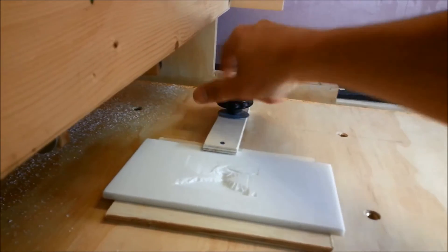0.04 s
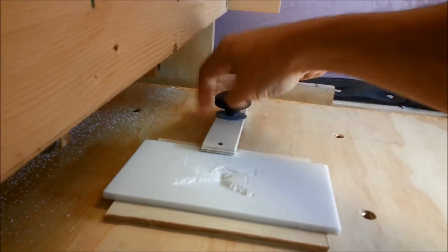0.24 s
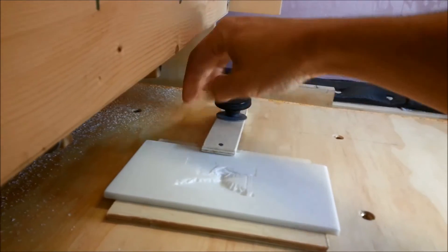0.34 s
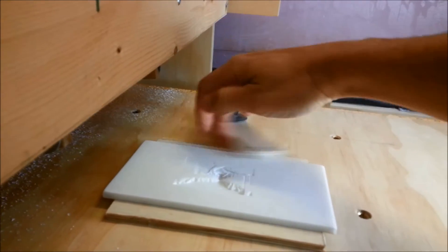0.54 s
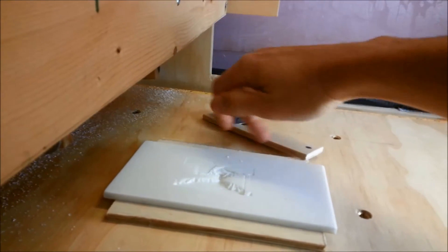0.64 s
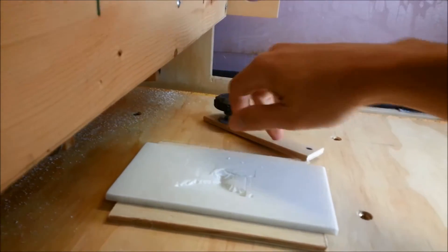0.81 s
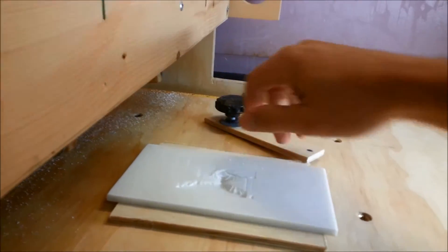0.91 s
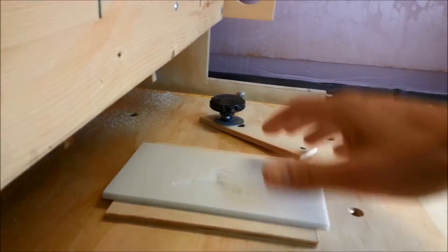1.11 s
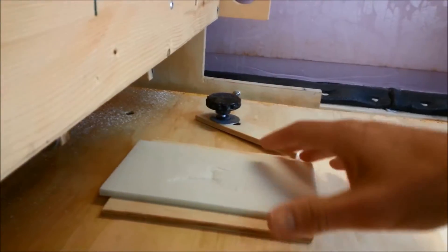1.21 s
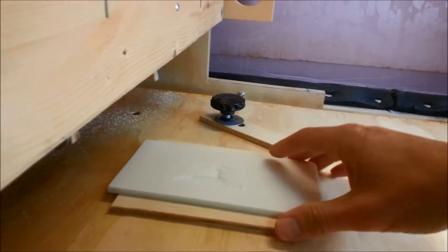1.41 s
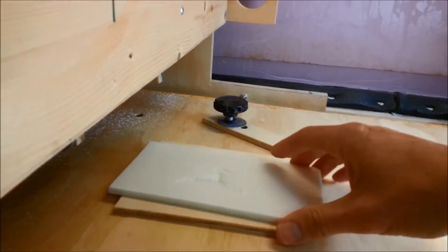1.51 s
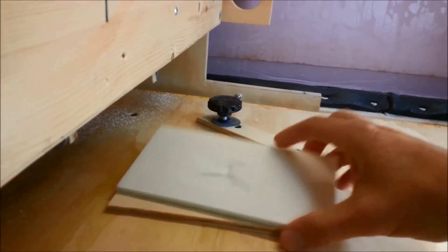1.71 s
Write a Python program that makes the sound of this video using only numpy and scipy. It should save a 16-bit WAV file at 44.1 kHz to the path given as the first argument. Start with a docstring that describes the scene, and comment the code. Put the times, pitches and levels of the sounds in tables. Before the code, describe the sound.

A clamp is loosened close by, slightly to the right, its knob rasping and ticking from about 0.2 to 0.5 seconds. The metal bar scrapes briefly around 0.6 seconds, then drops onto wood at 0.65 with a sharp, briefly ringing knock and a small rebound. A hand bumps the workpiece dully near 1.4 seconds. Faint machine hum and a thin high whine continue throughout in a small, dull room.

```python
"""Loosening a hold-down clamp

A hand spins the knob loose on a wooden machine bed: stick-slip friction rasps in the thread and small
impacts tick. The metal bar slides off the workpiece and drops, exciting the modes of bar and bed in a
ringing knock; later the hand bumps the workpiece. The idle machine hums and its motors whine. The clamp
is heard from slightly right, with reflections from close wooden panels and a small, dull room."""
import sys
import numpy as np
from scipy import signal
from scipy.fft import rfft, irfft
from scipy.io import wavfile
from scipy.ndimage import uniform_filter1d

SR = 44100
rng = np.random.default_rng(int(sys.argv[2]) if len(sys.argv) > 2 else 0)


def generate_wav(signal):
    """Clip the signal to [-1, 1] and save it as 16-bit WAV at the path in sys.argv[1]."""
    frames = np.transpose(np.atleast_2d(signal))
    scaled = np.clip(frames, -1, 1) * 32767
    pcm = np.round(scaled).astype(np.int16)
    wavfile.write(sys.argv[1], SR, pcm)


N = 77175
T = np.arange(N) / SR
BIN_HZ = np.arange(N + 1) * SR / (2 * N)

# Spectrum of the fan and room air: frequency_hz, gain_db
FAN_SPECTRUM = [(18, -41), (30, -27.5), (161, -19), (188, -4.5), (231, -19), (263, -4), (316, -15),
                (350, -6), (409, -3.5), (503, -5.5), (543, -10), (651, -5.5), (888, -8), (985, -14),
                (1120, -13.5), (1830, -19), (2200, -7), (2560, -17), (5570, -21.5), (6500, -29),
                (10400, -27.5), (11500, -23), (14500, -40)]
# Fan noise between the ears: frequency_hz, left_minus_right_db, coherence (0 to 1)
FAN_STEREO = [(100, -1, 0.42), (384, 0.5, 0.92), (760, -3.5, 0), (1580, -6, 0), (2500, 5.5, 0),
              (5000, 1.5, 0), (8100, -8.5, 0), (13100, 3.5, 0)]
# Envelope of the fan: time_s, level_db
FAN_ENVELOPE = [(0, -41), (.8, -39.5), (1.15, -40.5), (1.55, -40.5)]
# Hum of the idle machine: pitch_hz, level_db
HUM_TONES = [(415, -60), (652, -60), (2256, -68)]
# Motor whine: pitch_hz, relative_level_db, interaural_phase_rad
WHINE_TONES = [(11093, 0, 1.8), (11292, -5, 1.5), (11489, -15, 1.5)]
# Envelope of the whine: time_s, level_db
WHINE_ENVELOPE = [(0.0, -47.5), (0.17, -50.5), (0.316, -40.5), (0.502, -55), (0.658, -42.5), (0.696, -51),
                  (0.74, -48.5), (1.052, -59.5), (1.086, -51.5), (1.228, -58.5), (1.272, -49.5),
                  (1.462, -55), (1.5, -49), (1.75, -51.5)]

# Resonances of the clamped assembly: pitch_hz, level_db, t60_s
CLAMP_MODES = [(270, -30, 0.13), (357, -33.5, 0.1), (421, -30, .12), (458, -29.5, .12), (514, -27.5, 0.097),
               (615, -30.5, 0.17), (839.8, -26.5, 0.2), (1096, -23, 0.14), (1345, -25, 0.073),
               (1425.5, -25.5, 0.097), (1610, -33, 0.11), (2040, -29.5, 0.066), (2485, -32, 0.045),
               (3040, -31, 0.12)]
# Contacts of knob and bar with the bolt: start_s, level_db, pitch_hz
TICKS = [(.1991, -19, 1700), (.2095, -15, 2000), (.214, -20, 700), (.2446, -8, 1900), (.2628, -11, 2500),
         (.2665, -7, 2200), (.2686, -12, 1700), (.2702, -10, 1100), (.2801, -12, 1700), (.290, -17, 1400),
         (.302, -16, 1600), (.333, -16, 2000), (.3495, -16, 1600), (.5527, -10, 1300), (.5560, -18, 1100),
         (.5671, -6, 1500), (.6235, -11, 1500)]
# Spectrum of the jolt a tick gives the clamp and panels: frequency_hz, gain_db
JOLT_SPECTRUM = [(40, -42), (130, -34), (270, -12.5), (480, -6.5), (700, -20), (1300, -5.5), (2100, 5.5),
                 (3100, -11), (4300, -20), (8000, -35), (14000, -55)]
# Envelope of the thread's rasp: time_s, level_db
RASP_ENVELOPE = [(.17, -52), (.198, -49), (.213, -35), (.235, -32), (.252, -24.5), (.268, -18),
                 (.286, -26.5), (.316, -28.5), (.336, -26.5), (.36, -25.5), (.376, -29.5), (.396, -27),
                 (.418, -36), (.445, -32.5), (.48, -37), (.53, -43.5), (.55, -47), (.56, -35), (.575, -26),
                 (.59, -36), (.612, -31), (.645, -28), (.66, -56)]
# Spectrum of the rasp: frequency_hz, gain_db
RASP_SPECTRUM = [(40, -56), (130, -34.5), (260, -9), (450, 1), (680, -1.5), (1000, -1), (1350, 0),
                 (2200, -2.5), (2900, -11), (3700, -13.5), (4600, -12), (6500, -29), (8000, -19),
                 (14000, -54)]
# Envelope of the sliding bar, then of skin on the workpiece: time_s, level_db
SLIDE_ENVELOPE = [(.52, -49), (.555, -32.5), (.573, -28.5), (.59, -29), (.608, -36.5), (.622, -28.5),
                  (.642, -40.5), (.67, -50), (1.5, -50.5), (1.555, -43.5), (1.62, -50.5)]
# Spectrum of the sliding hiss: frequency_hz, gain_db
SLIDE_SPECTRUM = [(300, -15), (1500, 10), (3000, 9), (4200, 1.5), (5600, 2.5), (6500, -6), (7900, 2),
                  (9500, -5.5), (11000, -6), (14500, -23)]

# Blows on the bed: start_s, snap_db, chatter_db, bar_ring_db, bed_thud_db, frame_boom_db, cutoff_hz
BLOWS = [(.267, -30, -1, -17.5, -13.5, -16, 3000), (.553, -40, -36, -40, -16.5, -30, 1500),
         (0.649, 0, 0.5, 1, 0.5, 3, 19800), (.6775, -10.5, -15, -10, -22, -34, 3400),
         (1.413, -53, -45, -45, -15.5, -30, 595), (1.4338, -21.5, -22, -15.5, -28, -4.5, 2200),
         (1.59, -34, -38, -43, -39, -13, 600)]
# Spectrum of a blow's first contact: frequency_hz, gain_db
SNAP_SPECTRUM = [(40, -45), (200, -22), (600, -3), (1300, 2), (2200, 8), (3300, 2), (4500, -12),
                 (6200, -28), (8000, -7), (10000, -17.5), (14000, -20)]
# Spectrum of the bar's chatter on the bed: frequency_hz, gain_db
CHATTER_SPECTRUM = [(40, -47), (130, -28), (330, 2), (600, -6.5), (1150, 4.5), (1650, -6.5), (2300, 3),
                    (2700, -17), (3200, -1), (4400, -10.5), (5200, -13), (6200, -18), (7900, -1),
                    (9800, -29), (14000, -33)]
# Resonances of the loose metal bar: pitch_hz, level_db, t60_s, left_minus_right_db
BAR_MODES = [(1019, -19.5, 0.13, -3), (1093.7, -9, 0.084, -8.5), (1370, -19, 0.099, -6), (2183, -50, .1, 9),
             (4266, -10, 0.093, -10.5), (4500, -21.5, 0.2, 6), (5080, -35, 0.29, 3), (7830, -23, 0.13, -12),
             (11088, -26, 0.11, -7)]
# Resonances of the wooden bed: pitch_hz, level_db, t60_s, left_minus_right_db
BED_MODES = [(177, -39.5, .15, -12), (206, -40.5, 0.6, 5), (265.3, -16, 0.25, -0.5), (288, -15, .12, 1.5),
             (334, -26.5, 0.18, -1), (398.6, -14, .11, 2), (425.4, -22.5, 0.12, 6), (696, -27.5, 0.21, 6)]

CLAMP_PAN_DB, LEFT_LAG_S, BASS_HZ = -10, 0.00026, 650  # the pan and the lag act above BASS_HZ


def amp(db):
    """Amplitude ratio of a level in decibels."""
    return 10 ** (np.asarray(db) / 20)


def unit(x):
    """Normalisation to an rms of 1."""
    return x / np.sqrt(np.mean(x ** 2))


def curve(rows):
    """Amplitude envelope, linear in decibels between (time_s, level_db) points."""
    return amp(np.interp(T, *np.array(rows).T))


def over_hz(rows, column=1):
    """Interpolation of a table column on a logarithmic frequency axis."""
    rows = np.array(rows)
    return np.interp(np.log(BIN_HZ + 1), np.log(rows[:, 0]), rows[:, column])


def shape(x, response):
    """Linear filtering: the spectrum is multiplied by a frequency response."""
    return irfft(rfft(x, 2 * N) * response)[..., :N]


def colour(x, points):
    """Minimum-phase filtering through (frequency_hz, gain_db) points, by folding the cepstrum."""
    cepstrum = irfft(np.log(amp(over_hz(points))))
    cepstrum[1:N] *= 2
    cepstrum[N + 1:] = 0
    return shape(x, np.exp(rfft(cepstrum)))


def convolve(x, response):
    """Convolution with an impulse response."""
    return shape(x, rfft(response, 2 * N))


def lowpass(hz, order=2):
    """Sections of a maximally flat low-pass filter."""
    return signal.butter(order, hz, fs=SR, output="sos")


def fade(t60_s):
    """Exponential damping: 60 dB are lost in t60_s."""
    return np.exp(-np.log(1000) * T / t60_s)


def rise(tau_s):
    """First-order onset with time constant tau_s."""
    return 1 - np.exp(-T / tau_s)


def impulses(rows):
    """Impulsive excitation: one sample for each (start_s, level_db) row."""
    train = np.zeros(N)
    for start_s, level_db in rows:
        train[int(start_s * SR)] += amp(level_db)
    return train


def walk(rate_hz):
    """Smooth random modulation with an rms of 1."""
    hold = int(SR / rate_hz)
    steps = np.repeat(rng.standard_normal(N // hold + 1), hold)
    return unit(uniform_filter1d(uniform_filter1d(steps, hold), hold)[:N])


def pan(db):
    """Ear gains for an interaural level difference, left minus right."""
    return amp(np.array([[.5], [-.5]]) * db)


def treble_share():
    """Weight of interaural differences: 0 in the bass, where both ears hear alike, 1 in the treble."""
    return 1 - 1 / (1 + (BIN_HZ / BASS_HZ) ** 4)


def mid_side_noise(mid_power, side_power):
    """Stereo noise as the sum of an in-phase and an antiphase part."""
    mid, side = rng.standard_normal((2, N))
    return shape(mid, np.sqrt(mid_power)) + np.array([[1], [-1]]) * shape(side, np.sqrt(side_power))


def diffuse():
    """Diffuse-field noise: coherent between the ears in the bass, incoherent above."""
    side_power = treble_share() / 2
    return mid_side_noise(1 - side_power, side_power)


def band(hz, width_hz):
    """Narrow-band stereo noise with an rms of 1."""
    detuning = (BIN_HZ - hz) / width_hz
    return unit(shape(rng.standard_normal((2, N)), 1 / (1 + detuning ** 2)))


def ring(modes):
    """Modal superposition: damped sinusoids, the higher ones reaching the left ear late."""
    sound = 0
    for hz, db, t60_s, side_db in modes:
        lag_s = np.array([[LEFT_LAG_S], [0]]) * (hz > BASS_HZ)
        sound = sound + pan(side_db) * amp(db) * fade(t60_s) * np.sin(2 * np.pi * hz * (T - lag_s))
    return sound


def reflections(t60_s):
    """Reverberation: an exponentially decaying diffuse impulse response of unit energy."""
    cloud = diffuse() * fade(t60_s) * rise(0.0017) ** 2
    return unit(cloud) / np.sqrt(N)


def fan():
    """Broadband air noise whose interaural coherence and balance vary with frequency."""
    coherence = np.clip(over_hz(FAN_STEREO, column=2), 0, 1)
    air = mid_side_noise(1 + coherence, 1 - coherence)
    air = shape(air, pan(over_hz(FAN_STEREO)) / np.sqrt(1 + coherence))
    return unit(colour(air, FAN_SPECTRUM)) * curve(FAN_ENVELOPE)


def machine_hum(flutter_db=3, drift_hz=7):
    """Low tones that waver under random amplitude and frequency modulation."""
    hum = 0
    for hz, db in HUM_TONES:
        peak = np.sqrt(2) * amp(db + flutter_db * walk(20))
        phase = 2 * np.pi * np.cumsum(hz + drift_hz * walk(40)) / SR
        hum = hum + peak * np.sin(phase)
    return hum * pan(-5.0)


def motor_whine(flutter_db=1.5, drift_hz=3):
    """High tones in a haze of narrow-band noise, amplitude-modulated separately at each ear."""
    whine = band(WHINE_TONES[0][0], width_hz=130) * amp(-5.5)
    for hz, db, interaural_rad in WHINE_TONES:
        phase = 2 * np.pi * np.cumsum(hz + drift_hz * walk(37)) / SR
        flutter = amp(flutter_db * np.array([walk(9), walk(9)]))
        tone = np.sin(phase + np.array([[0], [interaural_rad]]))
        whine = whine + np.sqrt(2) * amp(db) * flutter * tone
    return whine * curve(WHINE_ENVELOPE) * amp(1.5) * pan(1.0)


def sliding_hiss():
    """Sliding friction of the bar, and later of skin, on the workpiece: noise with a flickering level."""
    hiss = unit(colour(diffuse(), SLIDE_SPECTRUM))
    flicker = amp(2 * walk(200))
    return hiss * curve(SLIDE_ENVELOPE) * flicker * pan(-1.2)


def edge_scuff(peak_s=.619, half_width_s=0.0092):
    """Brief friction as the bar scrapes off the edge: a bell-shaped pulse of narrow-band noise."""
    return band(8070, width_hz=550) * amp(-33) * np.exp(-((T - peak_s) / half_width_s) ** 2)


def tick(start_s, level_db, pitch_hz, swell_s=.00055):
    """A dry contact: a heavily damped transient of about two cycles."""
    age = np.maximum(T - start_s, 0)
    swell = age / swell_s * np.exp(1 - age / swell_s)
    return amp(level_db) * swell ** 2 * np.sin(2 * np.pi * pitch_hz * age)


def bolt_ticks(spike, direct, body, panels):
    """Small impacts on the bolt radiate directly, excite the clamp's modes and reflect off the panels."""
    contacts = sum(tick(*row) for row in TICKS)
    jolts = colour(impulses([row[:2] for row in TICKS]), JOLT_SPECTRUM)
    jolts /= np.abs(colour(spike, JOLT_SPECTRUM)).max()
    return convolve(contacts, direct) * amp(2.5) + convolve(jolts, body * amp(-18) + panels * amp(-9))


def stick_slip(slips_per_s=2500, spread_db=3.5):
    """Stick-slip friction: a dense random train of tiny impulses of uneven size."""
    slipping = rng.random(N) < slips_per_s / SR
    size = amp(spread_db * np.clip(rng.standard_normal(N), -2, 2))
    return slipping * size * rng.choice([-1, 1], N)


def thread_rasp(direct, body, panels, dull_above_hz=2300):
    """Friction in the thread drives the clamp's modes; a slower, quieter turn is also duller."""
    paths = direct + body * amp(-12) + panels * amp(5.5)
    rasp = unit(convolve(colour(stick_slip(), RASP_SPECTRUM), paths))
    dull = signal.sosfiltfilt(lowpass(dull_above_hz, order=3), rasp)
    effort = curve(RASP_ENVELOPE)
    treble_gain = (effort / effort.max()) ** 0.65
    return effort * (dull + (rasp - dull) * treble_gain)


def turning_knob():
    """Ticks and rasp share three paths; interaural time and level differences place them to the right."""
    spike = impulses([(0.00038, 0)])
    left_delay = np.exp(-2j * np.pi * BIN_HZ * round(LEFT_LAG_S * SR) / SR)
    direct = np.array([shape(spike, 1 + (left_delay - 1) * treble_share()), spike])
    body = ring([(hz, db, t60_s, 0) for hz, db, t60_s in CLAMP_MODES])
    panels = reflections(t60_s=0.043)
    knob = bolt_ticks(spike, direct, body, panels) + thread_rasp(direct, body, panels)
    return shape(knob, pan(CLAMP_PAN_DB * treble_share()))


def contact_snap():
    """The first contact of a blow: a short transient with a broad spectrum."""
    noise = unit(colour(diffuse(), SNAP_SPECTRUM))
    return noise * rise(0.0013) * fade(0.017) * amp(-0.5) * pan(-0.4)


def bar_chatter():
    """Rapid rebounds of the bar on the bed merge into noise with a two-stage decay."""
    envelope = rise(0.0029) * (fade(0.03) + amp(-12.5) * fade(0.18))
    return unit(colour(diffuse(), CHATTER_SPECTRUM)) * envelope * amp(-8.5) * pan(1)


def bar_ring(roughness=0.48, chatter_hz=397, choke_s=0.067):
    """Chatter modulates each mode of the bar; contact damping chokes the ring once it lies flat."""
    modes = sum(ring([mode]) * (1 + roughness * walk(chatter_hz)) for mode in BAR_MODES)
    choke = np.exp(-(T / choke_s) ** 4)
    return modes * rise(0.0069) * choke


def knocks():
    """Impacts excite bar, bed and frame; the softer the contact, the lower the spectrum's cutoff."""
    bed_thud = ring(BED_MODES) * rise(0.005)
    frame_boom = amp(-38.5) * np.sin(2 * np.pi * 74 * T) * fade(.35) * rise(0.045)
    parts = contact_snap(), bar_chatter(), bar_ring(), bed_thud, frame_boom
    sound = 0
    for start_s, *levels_db, cutoff_hz in BLOWS:
        blow = sum(amp(db) * part for db, part in zip(levels_db, parts))
        blow = signal.sosfilt(lowpass(cutoff_hz), blow)
        sound = sound + convolve(blow, impulses([(start_s, 0)]))
    return sound


def scene():
    """Superposition of the handling sounds, their dull reverberation and the idle machine."""
    handling = turning_knob() + sliding_hiss() + edge_scuff() + knocks()
    room = signal.sosfilt(lowpass(3000), reflections(t60_s=0.49) * amp(-22.5))
    return handling + convolve(handling, room) + fan() + machine_hum() + motor_whine()


def record(dry):
    """Soft saturation rounds the highest peaks, and a steep low-pass limits the bandwidth."""
    ceiling, top_hz = .92, 14750
    rounded = dry / (1 + (np.abs(dry) / ceiling) ** 6) ** (1 / 6)
    return signal.sosfilt(signal.ellip(10, .2, 80, top_hz, fs=SR, output="sos"), rounded)


dry = scene()
out = record(dry)
generate_wav(out)
```